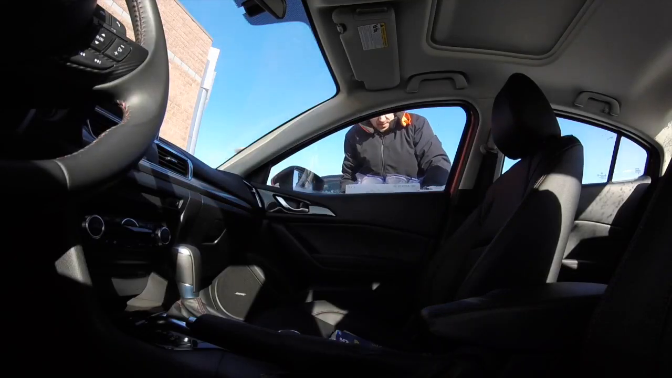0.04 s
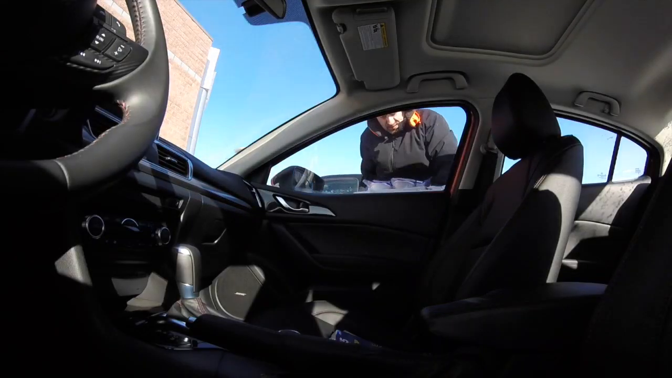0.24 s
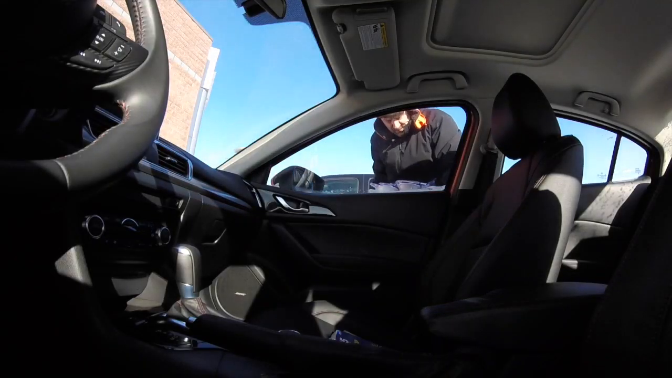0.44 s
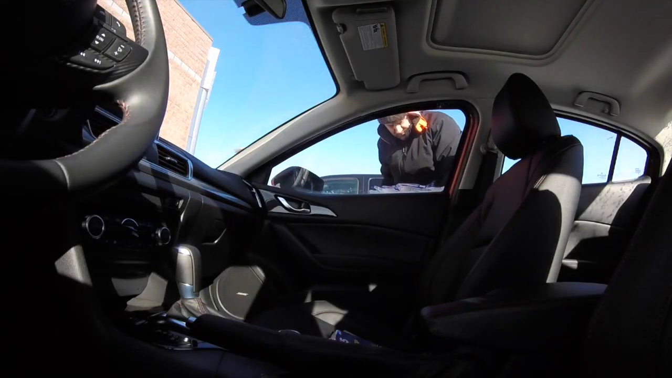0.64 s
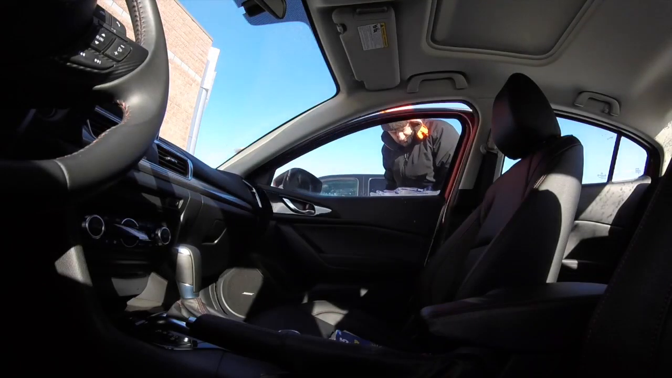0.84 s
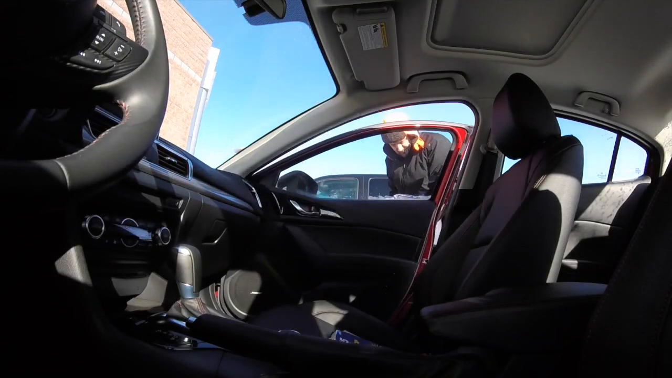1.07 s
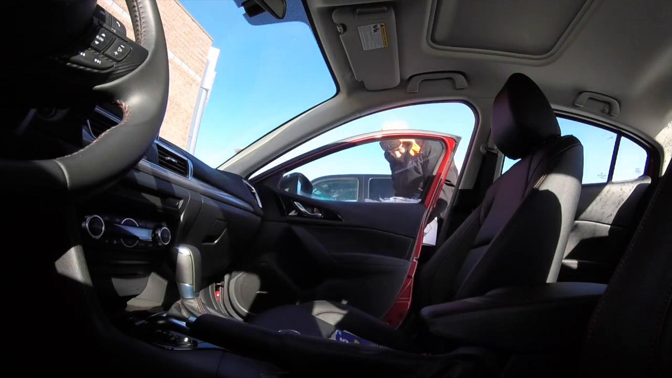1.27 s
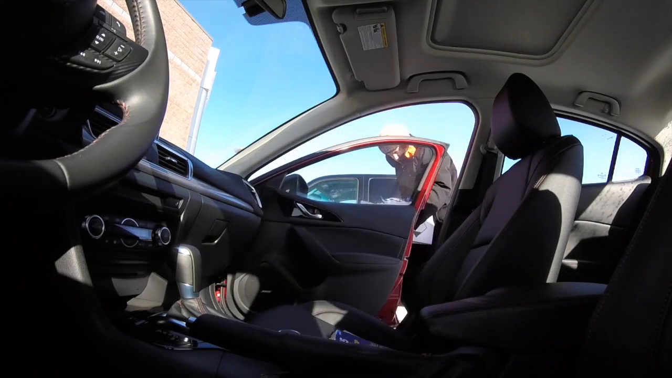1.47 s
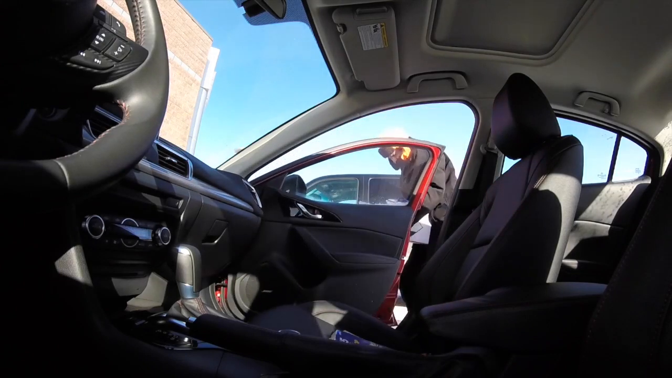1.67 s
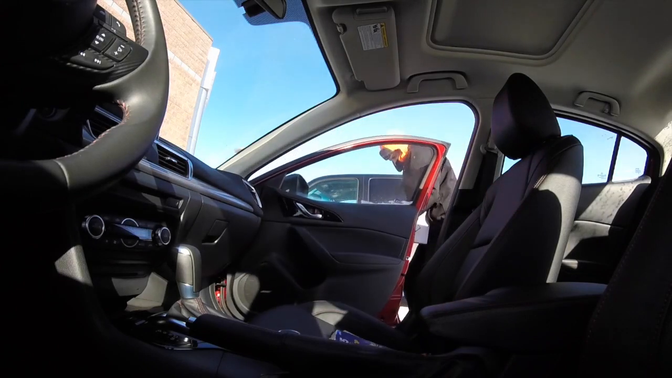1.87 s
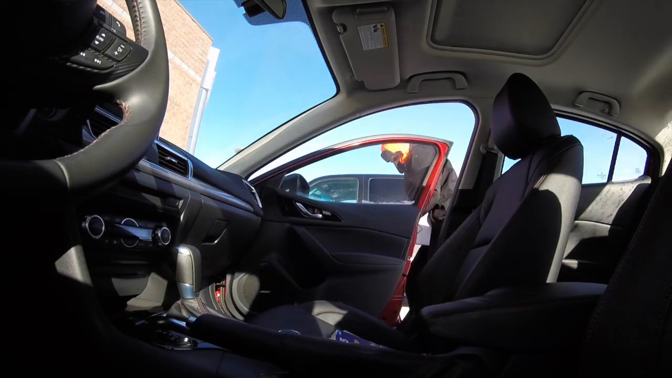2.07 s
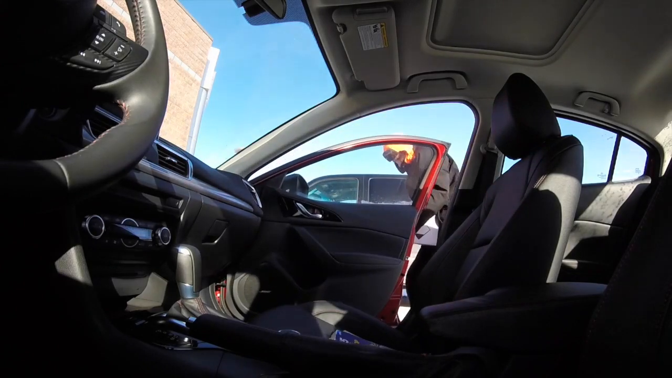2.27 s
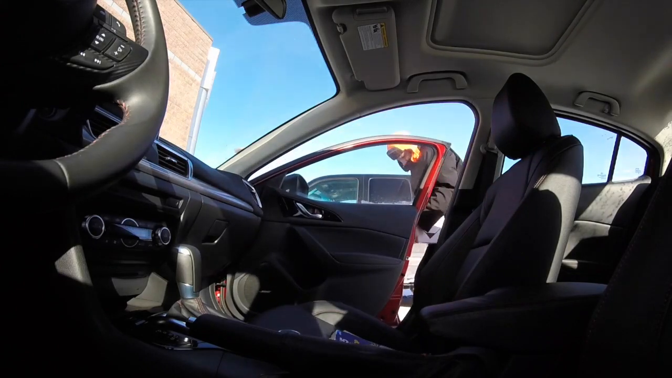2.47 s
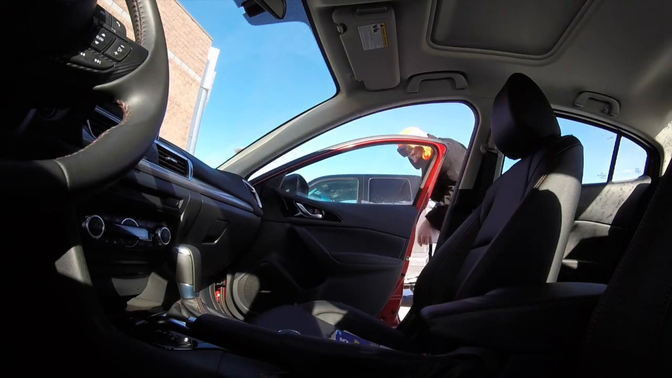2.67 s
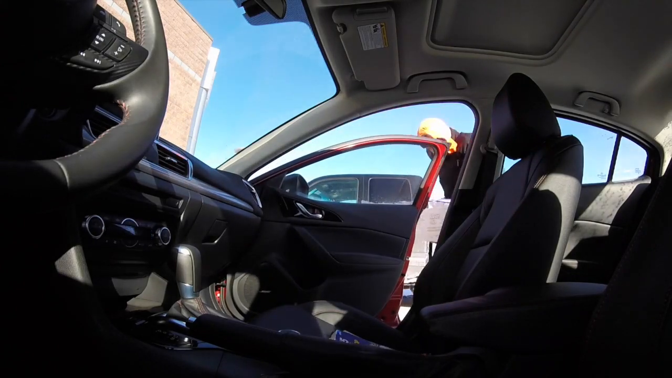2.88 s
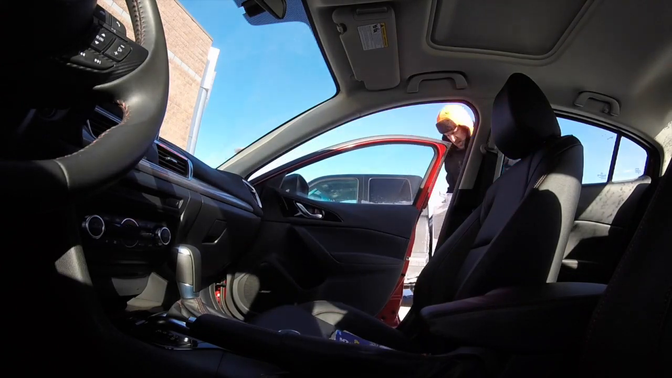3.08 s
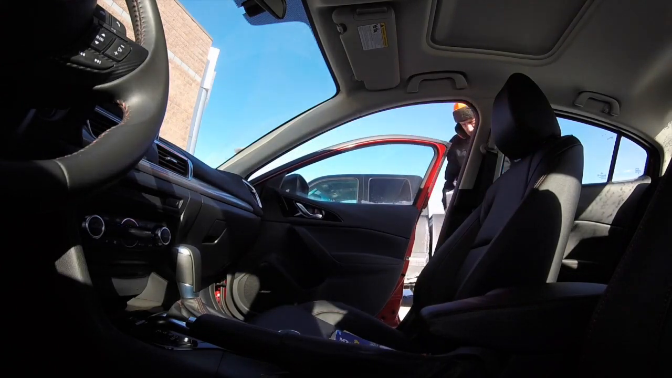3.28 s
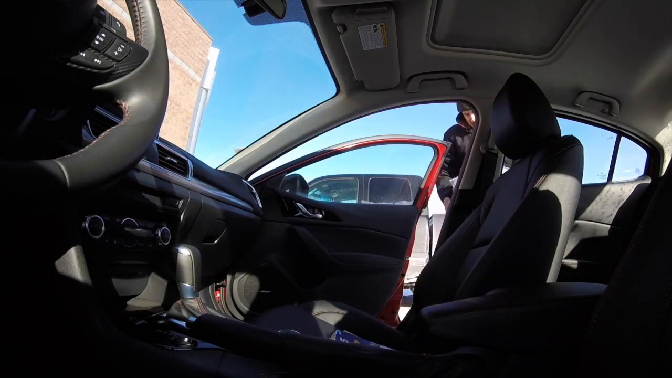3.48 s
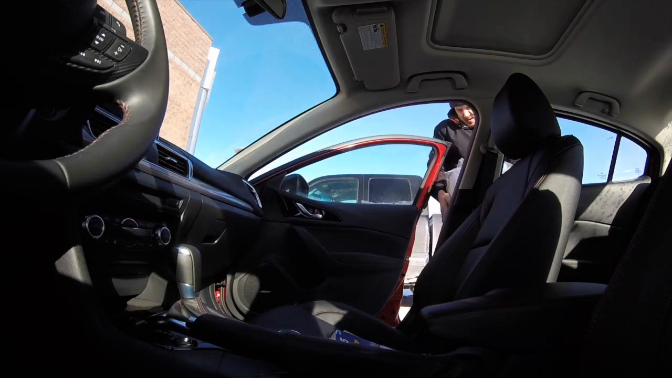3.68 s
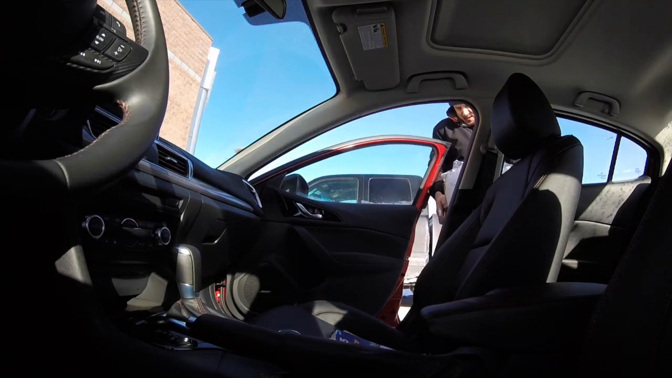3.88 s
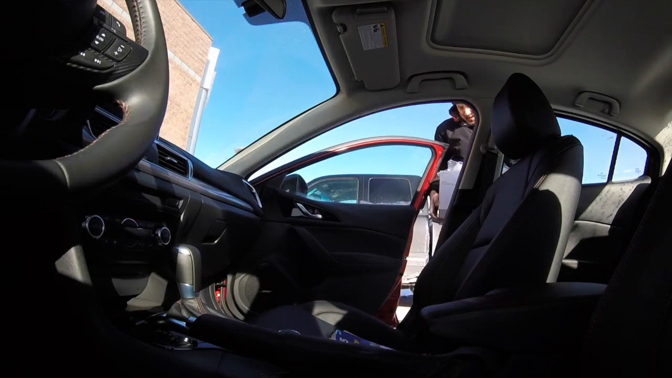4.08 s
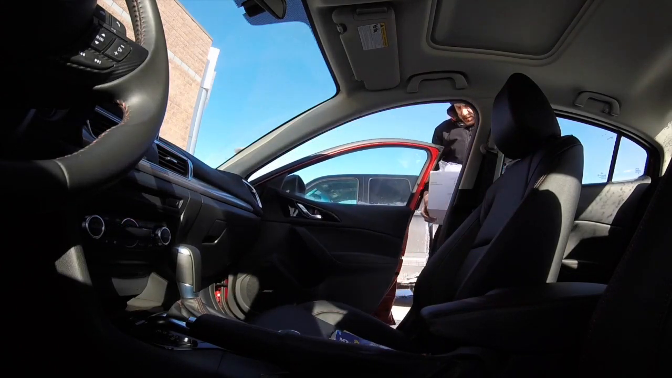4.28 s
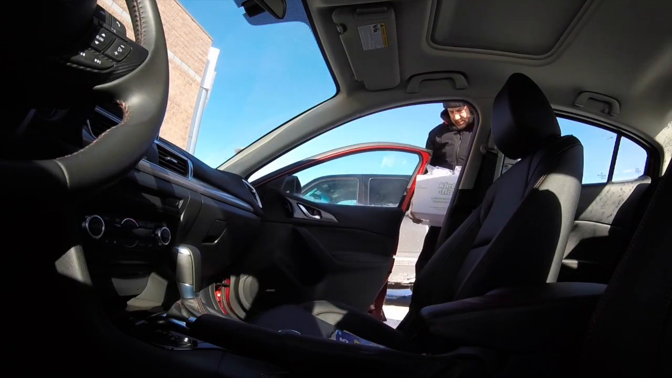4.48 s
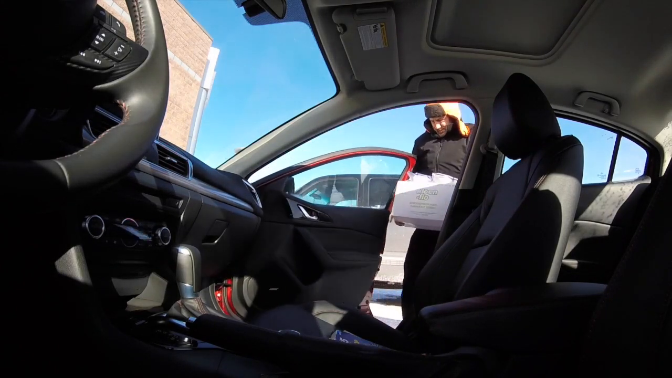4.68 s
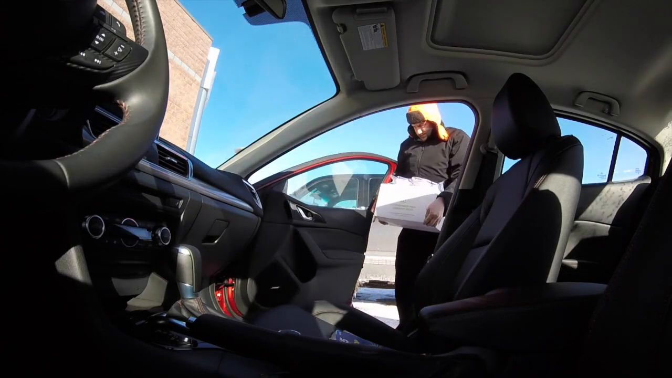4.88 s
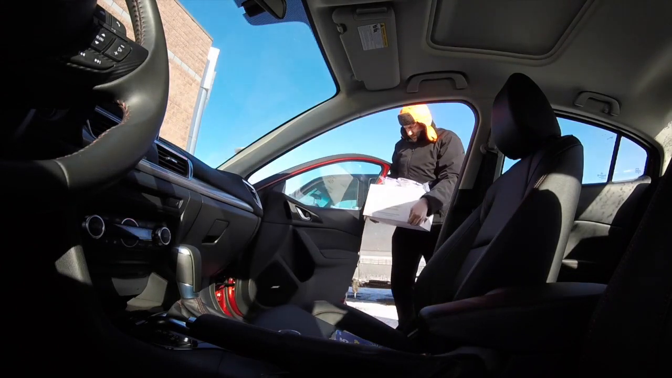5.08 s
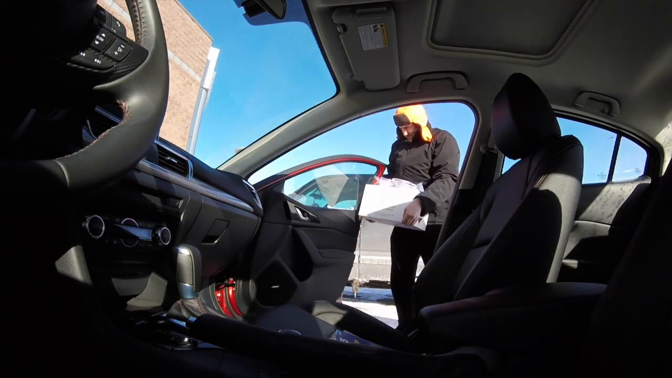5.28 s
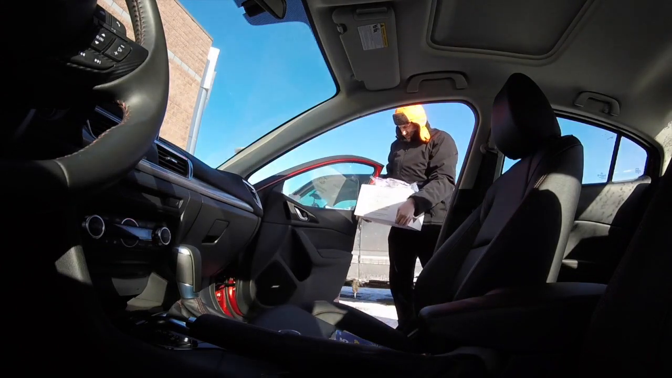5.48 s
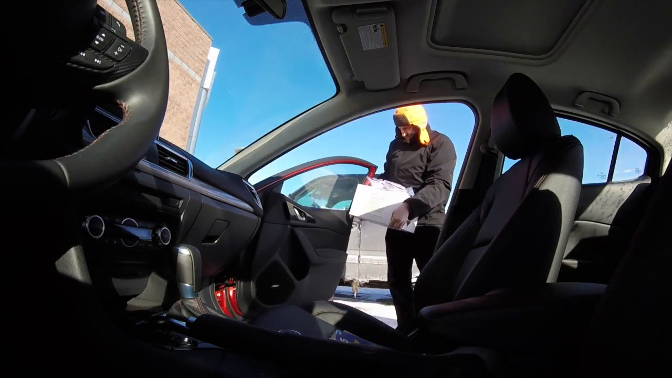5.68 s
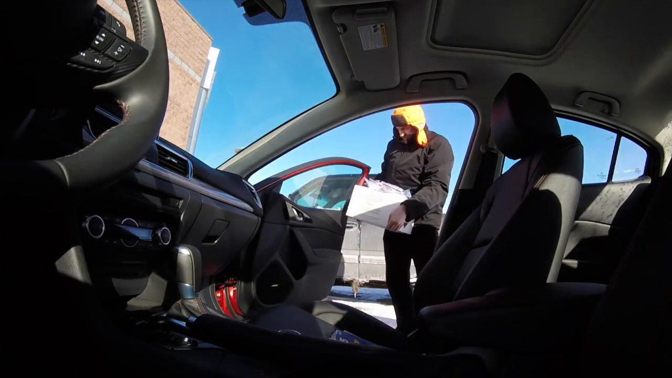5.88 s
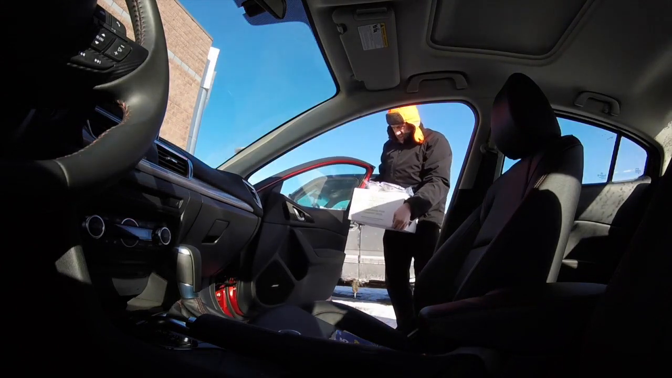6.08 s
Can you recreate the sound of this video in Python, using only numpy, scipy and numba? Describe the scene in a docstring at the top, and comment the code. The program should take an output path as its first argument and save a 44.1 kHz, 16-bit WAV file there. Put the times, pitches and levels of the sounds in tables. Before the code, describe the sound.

Muffled hum in a car cabin; passenger door unlatches and swings to a hard clunk, followed by jacket swishes, light knocks and a rising engine drone.

```python
"""Inside a parked car: muffled town hum, with one engine droning and later rising in pitch.
The passenger door's handle clicks and more hum comes in; its latch clacks and its seal thumps the cabin air.
The check strap rubs, knocks and squeaks as the door swings, then cracks at its stop over booming, damped modes.
Outside, a padded jacket swishes and grit scuffs (filtered grains); a box knocks (short decaying noise, own pitch).
A faint wavering whine passes; near the end stick-slip pulses ring the box walls in a squeaky scrape."""
import sys
import numpy as np
from scipy import signal
from scipy.fft import rfft, irfft
from scipy.io import wavfile
from scipy.ndimage import uniform_filter1d
from numba import njit

SR = 44100
rng = np.random.default_rng(int(sys.argv[2]) if len(sys.argv) > 2 else 0)


def generate_wav(sig):
    """Save sig (samples, or channels by samples) to the path in sys.argv[1] as 16-bit PCM at SR."""
    pcm = np.round(np.clip(np.atleast_2d(sig).T, -1, 1) * 32767).astype(np.int16)
    wavfile.write(sys.argv[1], SR, pcm)


N = 270949
T = np.arange(N) / SR
RING_T = T[:SR]


def unlatching():
    """The handle clicks and takes up its linkage; the latch clacks, rattles and rings the door skin."""
    # pull and take-up: start_s, level_db, treble_db, rise_s
    handle_blows = [(0.6365, -32, -15, 0.00065), (0.687, -41.5, 11, 0.002)]
    # handle spectrum: freq_hz, level_db
    handle_colour = [(150, 0), (300, 6.5), (550, 5.5), (820, 3.5), (1050, -2), (1250, 0), (1900, 0),
                     (2250, -17), (3300, -17), (5500, -17), (9000, -35), (15000, -50)]
    # release and claw rattle: start_s, level_db, treble_db, rise_s
    latch_blows = [(0.735, -24.5, -12, 0.0054), (0.752, -21, -6, 0.0009), (0.761, -28.5, 1, 0.0016),
                   (0.779, -26, 6, 0.0013), (0.796, -33, -7, 0.0012), (0.831, -36.5, 1, 0.0018),
                   (0.844, -34.5, -9, 0.0017), (0.869, -45, -17, .002)]
    # latch spectrum: freq_hz, level_db
    latch_colour = [(150, 9), (250, -2), (380, -11.5), (520, -1.5), (650, -6.5), (820, -14), (1000, -17),
                    (1400, -16), (1900, -15.5), (2150, -29), (3300, -25), (5200, -26), (10000, -35.5),
                    (15000, -48)]
    # latch and door skin resonances: freq_hz, width_hz, level_db
    latch_modes = [(503.5, 15, 5.5), (553, 14, -9), (666, 19, -5), (806, 16, 0), (1300, 40, -1),
                   (1870, 56, 0), (3240, 80, 1)]
    clicks = blows(handle_blows, handle_colour, low_t60=0.1, high_t60=0.066, split_hz=3600)
    clacks = blows(latch_blows, latch_colour, low_t60=0.11, high_t60=0.085, split_hz=6700)
    return clicks + clacks + body(clacks, latch_modes)


def seal_release():
    """Hand, handle and seal push on the cabin air, which rings in its low modes."""
    # Gaussian pushes: peak_s, level_db, length_s
    pushes = [(0.345, -39.5, 0.0013), (0.647, -31.5, 0.001), (0.688, -27, 0.0012), (0.738, -4, 0.0027),
              (0.837, -9.5, 0.0041), (0.988, -36.5, 0.0018)]
    # cabin air, door nearly shut: freq_hz, level_db, t60_s
    air_modes = [(13.05, -15, 0.66), (38.4, -11.5, 0.33), (66.4, -0.5, 0.11), (92, -1, 0.23),
                 (158.7, 6, 0.41)]
    push = np.zeros(N)
    for s, db, length in pushes:
        bump = np.exp(-((T - s) / length) ** 2 / 2)
        push += undb(db) * bump / (length * SR * np.sqrt(2 * np.pi))  # unit area before its level
    air = sum(undb(db) * np.cos(2 * np.pi * hz * RING_T) * fade(t60) for hz, db, t60 in air_modes)
    return signal.fftconvolve(push, air)[:N]


def door_stop():
    """The check strap cracks against its end and rebounds; panel and cabin modes build up and ring."""
    # hits and rebounds: start_s, level_db, treble_db, rise_s
    stop_blows = [(1.8795, -16.5, 4, 0.00099), (1.888, -19, 2.5, 0.00091), (1.971, -40, -7, 0.0015),
                  (2.036, -41, -2, 0.00058)]
    # crack spectrum: freq_hz, level_db
    stop_colour = [(260, -4), (400, -6), (620, -4.5), (800, -7), (1050, -13), (1400, -10.5), (1550, -16.5),
                   (1880, -9), (2150, -25), (2600, -23.5), (4000, -27), (6100, -26.5), (10000, -35),
                   (15000, -48)]
    # door panel and cabin modes: freq_hz, level_db, t60_s, build_up_s
    door_modes = [(92.3, -6, 0.31, 0.01), (104.7, -13, 0.28, .011), (137, -17, 0.28, 0.012),
                  (151.6, -16, 0.24, 0.0093), (171.6, -16, 0.31, 0.0042), (205.6, -26, 0.46, 0.017),
                  (246, -24, 0.21, 0.0031), (319, -33, 0.28, 0.0028), (390, -27, 0.19, 0.0026),
                  (449, -24, 0.19, 0.0026), (487, -31, 0.22, .003), (550, -24.5, 0.19, 0.004),
                  (598, -7.5, 0.06, 0.0028), (629, -11.5, 0.058, 0.0018), (717, -32, 0.15, .002),
                  (914, -28, 0.14, .001), (1150, -24.5, 0.089, 0.0008), (1263, -25, 0.058, 0.00082),
                  (1350, -20.5, 0.067, 0.0012), (1475, -30, 0.17, .001), (1854, -22, 0.067, 0.0012),
                  (1828, -21.5, .07, 0.0009), (2203, -29, 0.082, 0.00089)]
    stop_s, max_delay_s = 1.88, 0.00203
    out = blows(stop_blows, stop_colour, low_t60=0.11, high_t60=0.068, split_hz=3100)
    for hz, db, t60, build in door_modes:
        ring = np.sin(2 * np.pi * hz * RING_T) * fade(t60) * (1 - np.exp(-RING_T / build)) ** 2
        # each mode reaches the driver's side by its own path
        add(out, stop_s + max_delay_s * rng.random(), -undb(db) * ring)
    return out


def door_swing():
    """Fine, slightly uneven friction of the check strap sliding through its guide."""
    # friction spectrum: freq_hz, level_db
    swing_colour = [(380, 2), (540, 3.5), (700, 1.5), (880, 0), (1100, -16), (1400, -9.5), (1800, -7),
                    (2200, -22.5), (4000, -25)]
    start_s, hold_s, mean_db = 1.316, 0.362, -46.5
    sliding = stroke(start_s, hold_s, attack=0.035, release=0.023)
    friction = shape(grains(rate=2700, spread_db=4.0, t60=0.014), swing_colour)
    return friction * sliding * undb(mean_db + 1.3 * walk(24.44))


def knocks():
    """Light, dry knocks: one of the check strap as the door swings, then box and shoes, each with its pitch."""
    # knocks: start_s, level_db, treble_db, pitch_hz
    knock_rows = [(1.387, -39, -17, 992), (2.209, -38, -10, 650), (2.296, -42, -14, 561),
                  (2.437, -51, 7.5, 1710), (2.458, -45, -4, 900), (2.48, -42, -4, 1200),
                  (2.671, -42.5, 7.5, 1740), (2.707, -41, 6, 1530), (2.752, -40, 5.5, 1290),
                  (2.811, -38.5, 2, 584), (2.948, -48.5, 5, 1790), (3.069, -41.5, -2, 584),
                  (3.149, -43, -8, 650), (3.18, -44.5, 1, 1920), (3.23, -47, 5, 604),
                  (3.527, -47, -1, 1180), (3.718, -34.5, -10, 790), (3.752, -41.5, 1, 1370),
                  (3.897, -41, -1, 585), (3.948, -38.5, -8, 1790), (4.136, -37.5, -8, 1280),
                  (4.175, -46.5, -3, 1220), (4.244, -46, 3, 1315), (4.321, -49, 7, 1370),
                  (4.399, -49, 2, 1320), (4.553, -50, 8.5, 1380), (4.908, -42, -4, 751),
                  (4.943, -35, -13, 820), (4.996, -35.5, -8, 830), (5.141, -42.5, 7.5, 1710),
                  (5.238, -39.5, -8, 810), (5.357, -38.5, -4, 1740), (5.887, -44, -5, 890),
                  (5.939, -33, -8, 790), (6.11, -46, 4.5, 1700)]
    # knock spectrum: freq_hz, level_db
    knock_colour = [(350, 4), (500, 3.5), (900, -3), (1350, -3), (1900, 0.5), (2250, -7.5), (3400, -9),
                    (6000, -21), (9000, -23), (14000, -42)]
    out = np.zeros(N)
    for s, db, treble_db, hz in knock_rows:
        tap = blow(knock_colour, treble_db, rise=.0004, low_t60=0.051, high_t60=0.047, split_hz=1900)
        pitched = resonate(tap, np.full(SR, hz, float), 0.19)
        add(out, s, undb(db) * (0.71 * tap + 1.48 * pitched))
    return out


def box_scrape():
    """Uneven stick-slip pulses, faster under more force, ring the box walls; the rubbed surface hisses."""
    # glove catches, then slips hard: peak_s, level_db, swell_s, fade_s
    scrape_strokes = [(5.893, -44.5, .004, .05), (5.975, -35.5, .014, 0.01), (5.995, -30.5, 0.014, 0.023)]
    # box walls: freq_hz, width_hz, level_db
    box_modes = [(365, 22, -7), (487, 24, 0.5), (583, 22, 2.5), (646, 12, 5), (1513, 16, 0), (1554, 25, -6),
                 (1688, 26, -1.5), (1820, 120, -32), (3297, 34, -8), (4100, 89, -18.5), (4930, 430, -21)]
    # rub hiss spectrum: freq_hz, level_db
    rub_colour = [(400, 6), (700, -3), (1000, -0.5), (1800, 5), (2300, -12), (5200, -11), (7500, -18),
                  (11000, -28), (15000, -34)]
    full_force_slip_hz, force_power = 308.5, 0.41  # slip rate before its random wander
    force = swells(scrape_strokes)
    effort = force / force.max()
    rate = full_force_slip_hz * effort ** force_power * undb(2 * walk(300))
    slips = np.diff(np.floor(np.cumsum(rate) / SR), prepend=0)  # one pulse per whole cycle
    slips = slips * undb(2 * walk(200))
    walls = body(slips + 0.089 * rng.standard_normal(N), box_modes)
    walls /= np.sqrt(np.average(walls ** 2, weights=effort))
    hiss = shape(grains(rate=3200, spread_db=2.0, t60=0.017), rub_colour)
    return (walls + undb(-4.5) * hiss) * force


def scuffing():
    """Shoes and box scuff grit; the check strap gives two short squeaks as the door swings."""
    # scuffs and strap squeaks: start_s, length_s, level_db, rub_pitch_hz
    rub_rows = [(1.165, .03, -59, 516), (1.545, 0.06, -53, 1850), (1.822, 0.059, -51, 1850),
                (2.066, .03, -50, 775), (2.124, 0.053, -43.5, 593), (2.448, .05, -51, 620),
                (2.635, 0.18, -55, 760.3), (2.95, .05, -50, 500), (3.048, 0.041, -43.5, 520),
                (3.152, 0.022, -51, 620), (3.228, .06, -48, 500), (3.369, 0.02, -50, 480),
                (3.716, 0.13, -52.5, 780), (3.9, 0.34, -61, 770), (4.88, 0.17, -47, 840),
                (5.146, .04, -45.5, 755), (5.241, .05, -47.5, 640), (5.452, 0.088, -53.5, 674),
                (5.816, 0.096, -53, 1800)]
    # grit spectrum: freq_hz, level_db
    scuff_colour = [(330, 0), (500, 4), (850, -3), (1100, -9.5), (1400, -8.5), (1850, -0.5), (2200, -16.5),
                    (4000, -18)]
    attack_s, release_s, rest_db = 0.026, 0.022, -66.5  # the feet never quite rest
    ring_db, damping = 5.5, 0.46  # resonance gain over the grit; width over centre
    rubs = np.array([undb(db) * stroke(s, length, attack_s, release_s) for s, length, db, hz in rub_rows])
    # the resonance follows the strongest rub
    pitch_hz = np.array(rub_rows, float)[rubs.argmax(axis=0), -1]
    cracks = grains(rate=800, spread_db=5.0, t60=0.041) * undb(2.0 * walk(35))
    grit = shape(cracks, scuff_colour)
    rung = unit(grit + undb(ring_db) * resonate(grit, pitch_hz, damping))
    return rung * np.hypot(rubs.max(axis=0), undb(rest_db))


def jacket():
    """Cloth swishes, swelling to each arm movement's fastest moment; its creases snap."""
    # arm movements: peak_s, level_db, swell_s, fade_s
    swishes = [(1.45, -65, 0.26, 0.29), (2.15, -57, 0.024, 0.046), (2.64, -57, .025, 0.18),
               (2.86, -54, 0.13, 0.06), (3.21, -49.5, 0.072, 0.071), (3.42, -54.5, 0.016, 0.042),
               (3.68, -50, 0.0076, 0.073), (3.76, -54, 0.11, 0.027), (3.92, -62, 0.13, 0.2),
               (4.04, -53, .015, 0.022), (4.83, -59, 0.036, 0.13), (5.0, -60.5, 0.11, 0.12),
               (5.23, -49, 0.19, 0.12), (5.9, -56, 0.054, 0.034), (6.13, -56, 0.048, .05)]
    # crease snaps: start_s, level_db
    creases = [(1.598, -52), (1.8204, -47.5), (3.1802, -36.5), (3.5835, -46.5), (3.673, -45.5),
               (4.4001, -41.5), (4.7782, -46), (4.9427, -46), (5.043, -45), (5.8493, -46)]
    # cloth spectrum: freq_hz, level_db
    jacket_colour = [(1300, -3.5), (1850, 6.5), (2300, -9.5), (3000, -1.5), (4200, -4.5), (5800, -2.5),
                     (8000, -7.5), (11000, -16), (15000, -26)]
    rest_db = -69  # between movements
    cracks = grains(rate=1300, spread_db=4.0, t60=0.049) * undb(1.0 * walk(45))
    cloth = shape(cracks, jacket_colour) * np.hypot(swells(swishes), undb(rest_db))
    snap_rows = [(s, db, 0, .0005) for s, db in creases]
    return cloth + blows(snap_rows, jacket_colour, low_t60=0.022, high_t60=0.046, split_hz=4400)


def street():
    """Muffled town hum throughout, joined by fuller noise through the doorway."""
    # hum heard from the start: freq_hz, level_db
    shut_colour = [(20, -16), (45, 0), (68, 4.5), (92, -20), (120, 2.5), (160, -11.5), (210, -16),
                   (600, -23), (1200, -27.5), (4000, -35.5), (9000, -44), (15000, -56)]
    # noise let in by the opening: freq_hz, level_db
    street_colour = [(20, 1.5), (33, -1), (45, -4.5), (62, 3), (85, -4), (120, -9), (170, -11.5),
                     (230, -12.5), (310, -29.5), (450, -23), (700, -39), (1800, -40.5), (6000, -53.5),
                     (14000, -66)]
    shut_db, street_db = -50.5, -43  # mean levels
    muffled = shape(rng.standard_normal(N), shut_colour) * undb(shut_db + .5 * walk(3.2))
    outside = shape(rng.standard_normal(N), street_colour) * undb(street_db + 1.0 * walk(6))
    return muffled + outside * doorway()


def engine():
    """An engine idles, then pulls away: a wavering tone at the firing rate over a band of noise."""
    # engine course: time_s, firing_rate_hz, level_db
    course = [(0, 75.7, -50.5), (.5, 68, -64), (1.5, 65.04, -51), (3.0, 66.8, -48.5), (4.0, 74, -47.5),
              (4.7, 80.16, -46.5), (5.1, 93.2, -44), (5.5, 96, -42.5), (5.8, 101.8, -45.5),
              (6.14, 102.9, -46)]
    # drone spectrum: freq_hz, level_db
    drone_colour = [(105, 5.5), (145, 3), (175, 2.5), (230, -24.5)]
    hz, db = curves(course)
    phase = 2 * np.pi * np.cumsum(hz * (1 + .012 * walk(9.9))) / SR
    drone = undb(-3.0) * shape(rng.standard_normal(N), drone_colour)
    return (np.sqrt(2) * np.sin(phase) + drone) * undb(db + 2 * walk(7))


def whine():
    """A distant machine's thin tone, wavering in pitch and level."""
    mean_hz, mean_db = 450, -61
    start_s, hold_s, release_s = 3.86, 0.47, 0.62
    phase = 2 * np.pi * np.cumsum(mean_hz * (1 + 0.00784 * walk(25.01))) / SR
    envelope = stroke(start_s, hold_s, attack=.18, release=release_s)
    return unit(np.sin(phase)) * envelope * undb(mean_db + 3.5 * walk(13))


def doorway():
    """Share of the outdoors let in: rises from 0 to 1 just after the first handle click."""
    open_s, opening_s = 0.64, .03
    return np.clip((T - open_s) / opening_s, 0, 1)


def cabin(x, t60, wet_db):
    """Dense, short reflections from the windows and the trim, as a decaying noise tail."""
    tail = rng.standard_normal(SR) * fade(t60)
    tail *= undb(wet_db) / np.linalg.norm(tail)
    return (x + signal.fftconvolve(x, tail)[:N]) / np.hypot(1, undb(wet_db))


def blows(rows, colour, low_t60, high_t60, split_hz):
    """A series of blows on one object; rows hold start_s, level_db, treble_db, rise_s."""
    out = np.zeros(N)
    for s, db, treble_db, rise in rows:
        add(out, s, undb(db) * blow(colour, treble_db, rise, low_t60, high_t60, split_hz))
    return out


def blow(colour, treble_db, rise, low_t60, high_t60, split_hz):
    """Coloured noise stands for a crowd of damped modes; lows and highs decay at their own pace."""
    crowd = shape(rng.standard_normal(SR), colour)
    low = lowpass(crowd, split_hz)
    ring = low * fade(low_t60) + undb(treble_db) * (crowd - low) * fade(high_t60)
    return (1 - np.exp(-RING_T / rise)) * ring


def body(x, modes):
    """Resonances of a body driven by x; modes hold freq_hz, width_hz, level_db."""
    return sum(undb(db) * signal.lfilter(*signal.iirpeak(hz, hz / width, fs=SR), x) for hz, width, db in modes)


@njit
def resonate(x, hz, damping):
    """Band-pass whose centre may move; damping is width over centre."""
    y, band, low = np.empty(len(x)), 0., 0.
    for i in range(len(x)):
        g = np.tan(np.pi * hz[i] / SR)
        v = (band + g * (x[i] - low)) / (1 + g * (g + damping))
        band, low, y[i] = 2 * v - band, low + 2 * g * v, damping * v
    return y


def grains(rate, spread_db, t60):
    """Random tiny cracks, rate per second, many weak and a few strong; each decays as noise."""
    chance = rng.random(N)
    size = np.minimum(rng.exponential(size=N), 4)
    energy = (chance < rate / SR) * undb(spread_db * size) ** 2
    keep = np.exp(-2 * np.log(1000) / (t60 * SR))  # energy left after one sample
    return np.sqrt(signal.lfilter([1], [1, -keep], energy)) * rng.standard_normal(N)


def stroke(s, hold, attack, release):
    """Envelope that swells up to time s, holds at 1 and dies away; attack and release are time constants."""
    return np.exp(-np.maximum(s - T, 0) / attack - np.maximum(T - s - hold, 0) / release)


def swells(rows):
    """Strength of overlapping movements that each peak and fade; their powers add."""
    return np.sqrt(sum((undb(db) * stroke(s, 0, swell, fall)) ** 2 for s, db, swell, fall in rows))


def fade(t60):
    """Free decay, 60 dB down after t60 seconds."""
    return np.exp(-np.log(1000) * RING_T / t60)


def walk(rate):
    """Smooth random wander with a spread near 1, from steps at rate per second, averaged twice."""
    k = int(SR / rate)
    steps = np.repeat(rng.standard_normal(N // k + 1), k)
    return unit(uniform_filter1d(uniform_filter1d(steps, k), k)[:N])


def shape(x, points):
    """Give x a spectrum of (freq_hz, level_db) points with steep skirts; rms 1."""
    hz, db = np.transpose(points)
    f = np.maximum(np.fft.rfftfreq(len(x), 1 / SR), 1)
    skirts = np.minimum(f / hz[0], 1) ** 3 * np.minimum(hz[-1] / f, 1) ** 3
    gain = undb(np.interp(np.log(f), np.log(hz), db)) * skirts
    return unit(irfft(rfft(x) * gain, len(x)))


def lowpass(x, hz):
    """The part of x below hz, without phase shift."""
    return signal.sosfiltfilt(signal.butter(2, hz, fs=SR, output="sos"), x)


def curves(rows):
    """Each column of a timed table, interpolated for every sample."""
    s, *columns = np.transpose(rows)
    return [np.interp(T, s, c) for c in columns]


def add(out, s, sound):
    """Mix a sound in at time s."""
    i = int(s * SR)
    out[i:i + len(sound)] += sound[:N - i]


def undb(db):
    """Decibels to amplitude gain."""
    return 10 ** (np.asarray(db) / 20)


def unit(x):
    """Scale to rms 1."""
    return x / np.sqrt(np.mean(x ** 2))


def scene():
    """Everything as it reaches the driver's side."""
    door = unlatching() + seal_release() + door_stop()
    past_doorway = doorway() * (scuffing() + jacket())
    rustle = cabin(door_swing() + past_doorway, t60=0.05, wet_db=-3)
    contacts = knocks() + box_scrape()
    background = street() + engine() + whine()
    return (door + rustle + contacts + background)[None]


def record(dry):
    """A steep elliptic low-pass cuts the top of the treble."""
    top_hz = 15000
    return signal.sosfilt(signal.ellip(8, .2, 70, top_hz, fs=SR, output="sos"), dry)


dry = scene()
out = record(dry)
generate_wav(out)
```